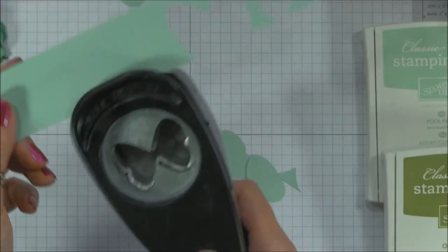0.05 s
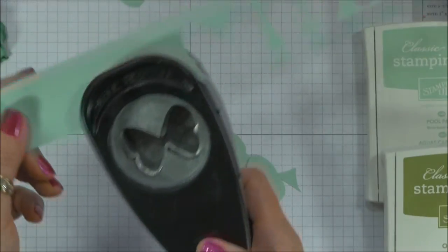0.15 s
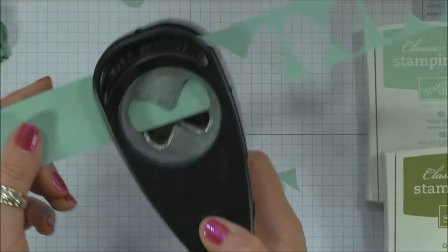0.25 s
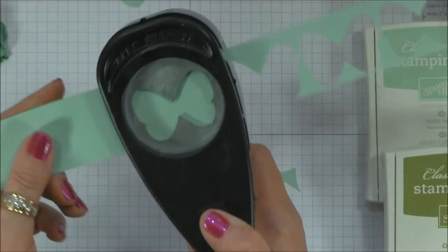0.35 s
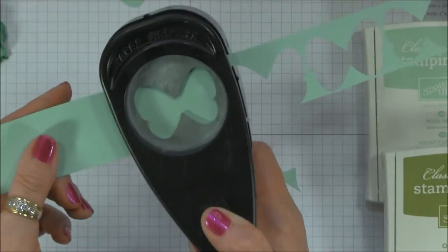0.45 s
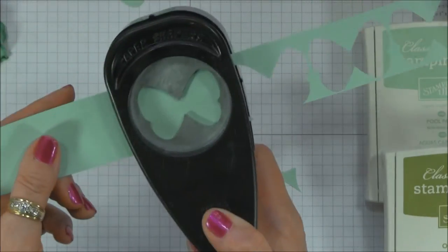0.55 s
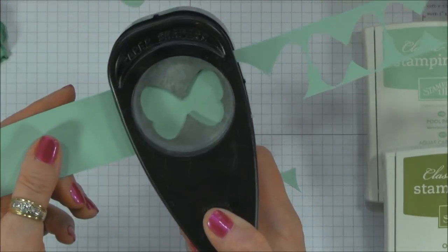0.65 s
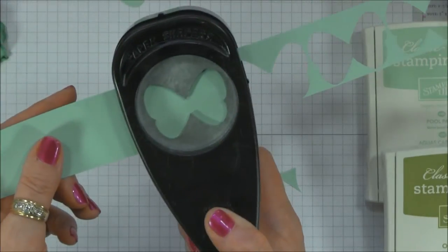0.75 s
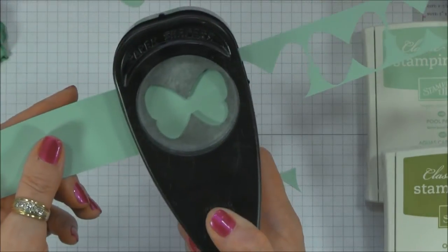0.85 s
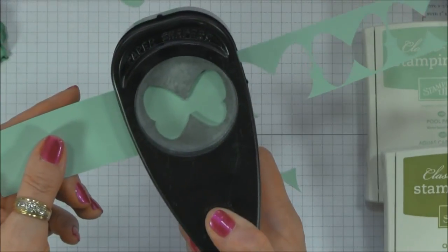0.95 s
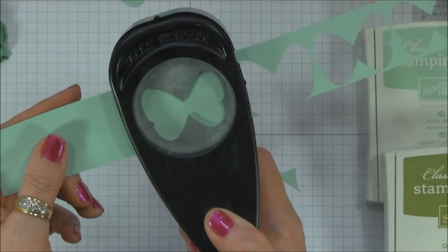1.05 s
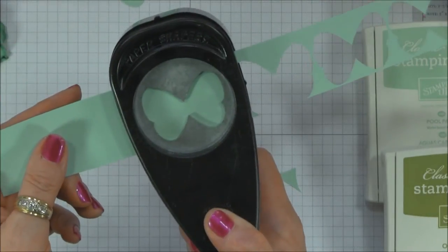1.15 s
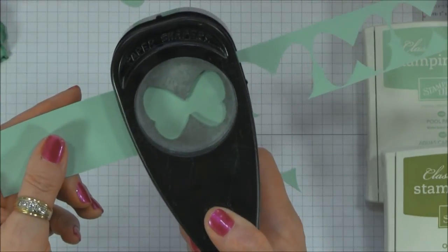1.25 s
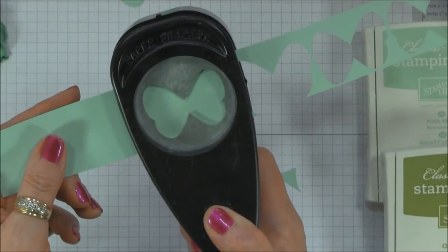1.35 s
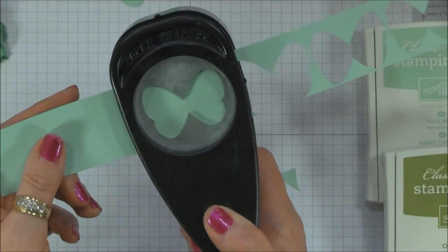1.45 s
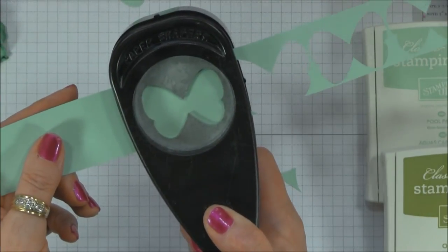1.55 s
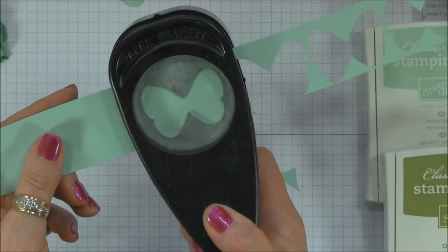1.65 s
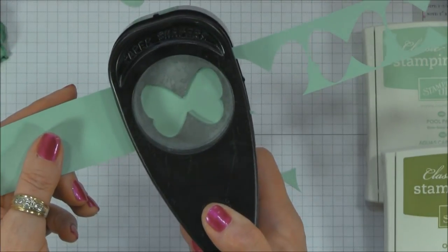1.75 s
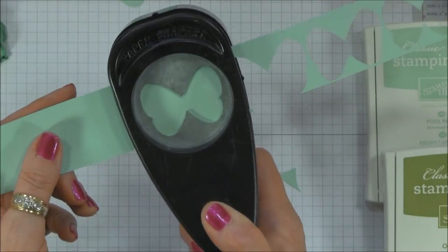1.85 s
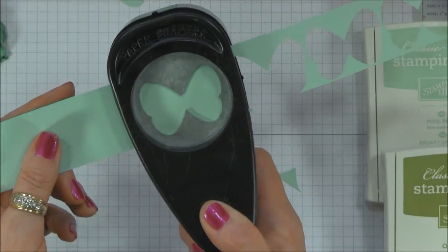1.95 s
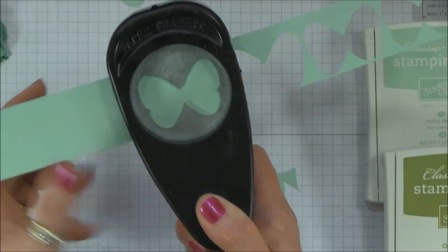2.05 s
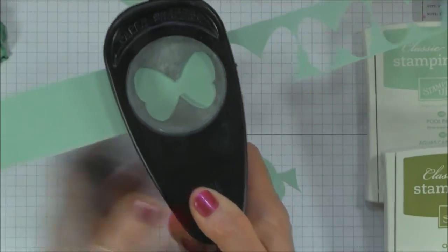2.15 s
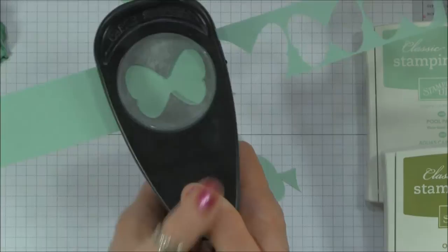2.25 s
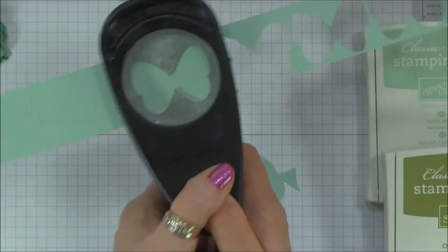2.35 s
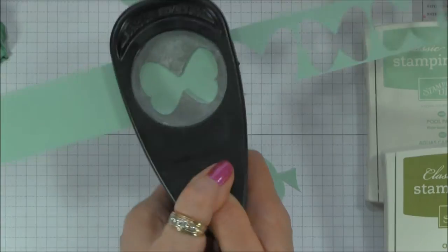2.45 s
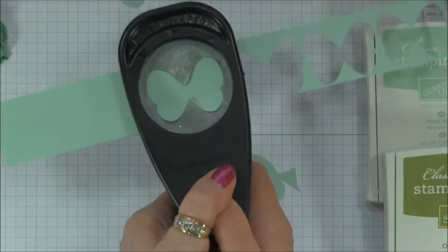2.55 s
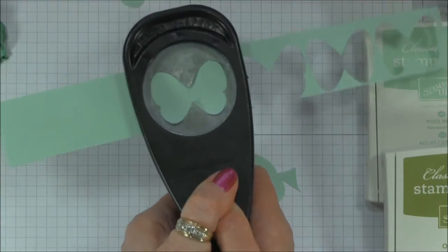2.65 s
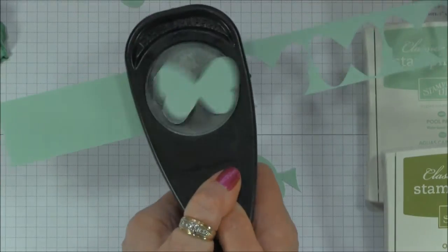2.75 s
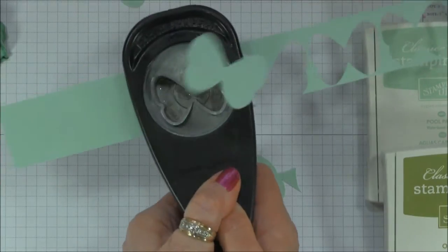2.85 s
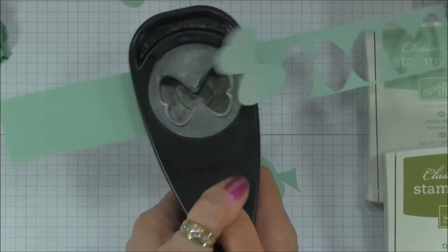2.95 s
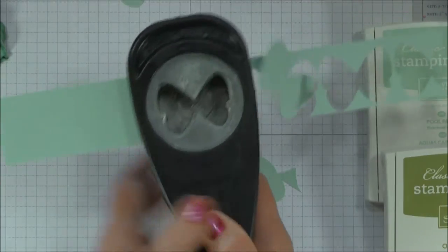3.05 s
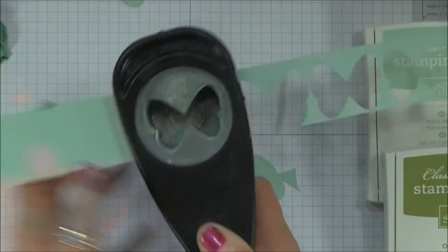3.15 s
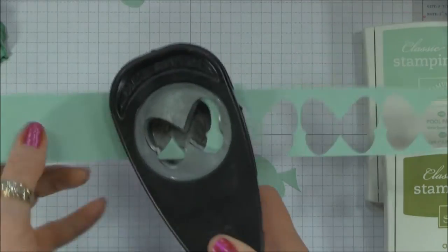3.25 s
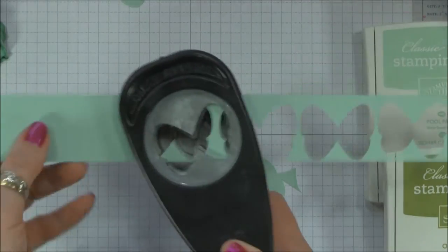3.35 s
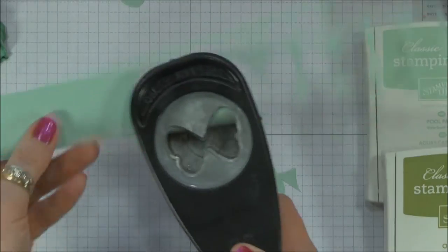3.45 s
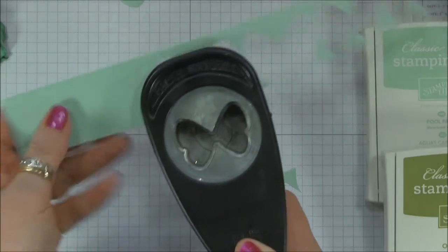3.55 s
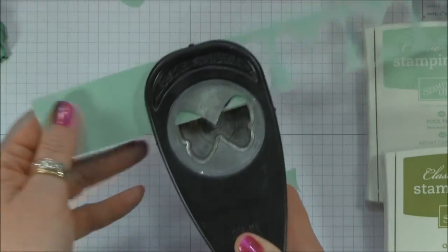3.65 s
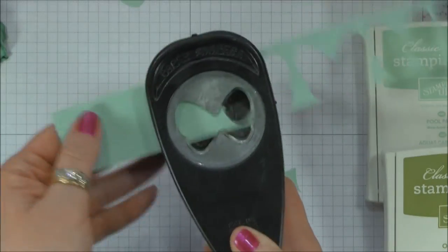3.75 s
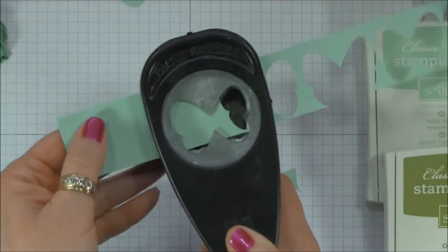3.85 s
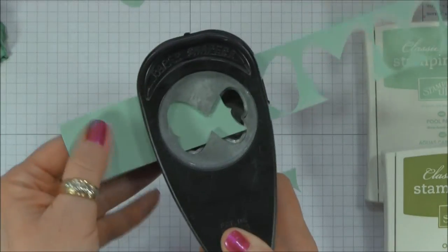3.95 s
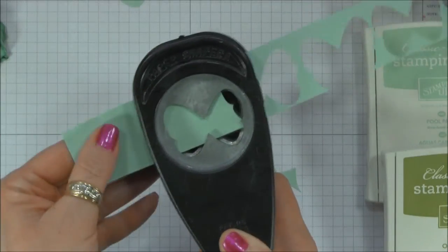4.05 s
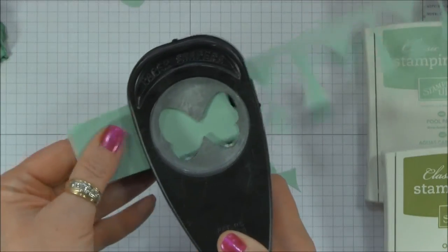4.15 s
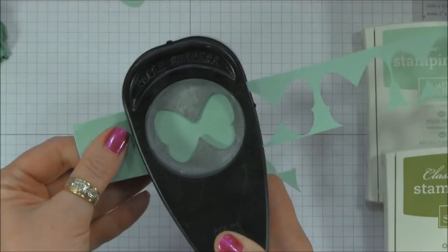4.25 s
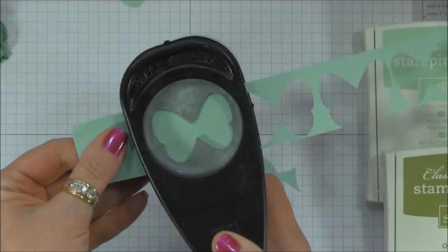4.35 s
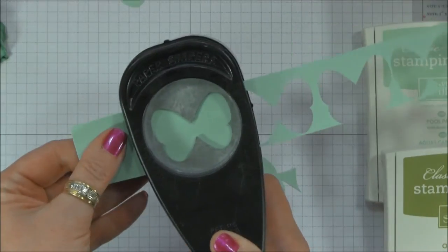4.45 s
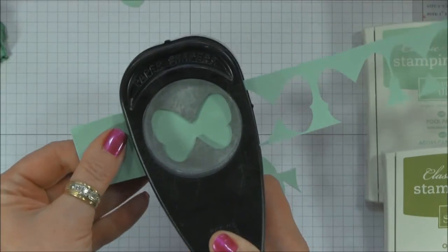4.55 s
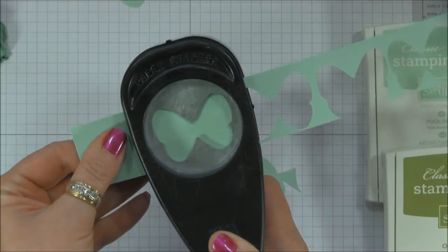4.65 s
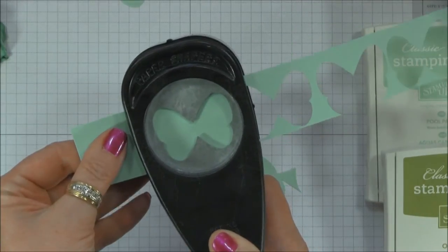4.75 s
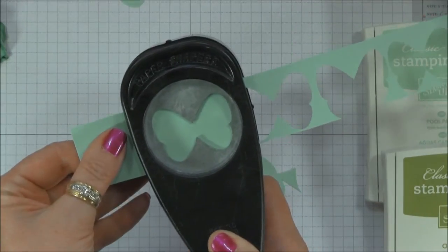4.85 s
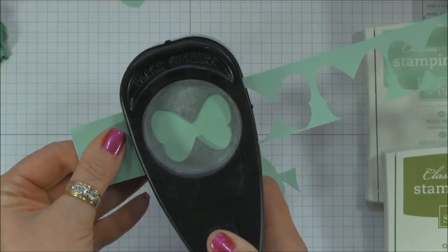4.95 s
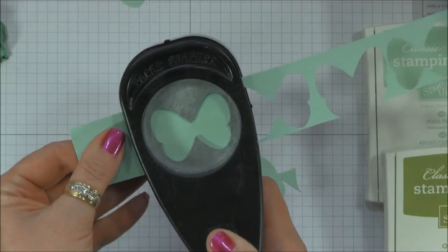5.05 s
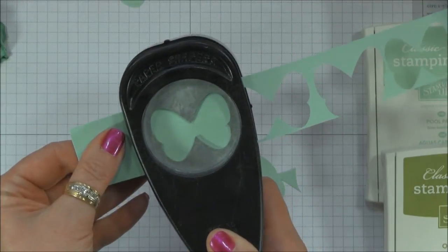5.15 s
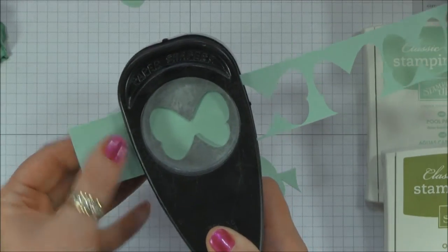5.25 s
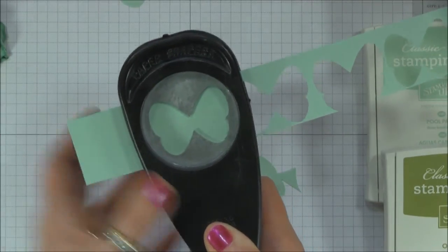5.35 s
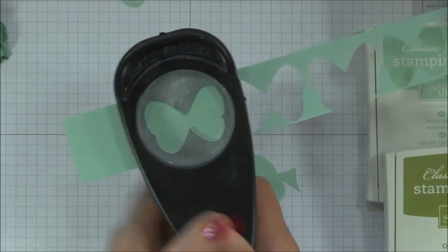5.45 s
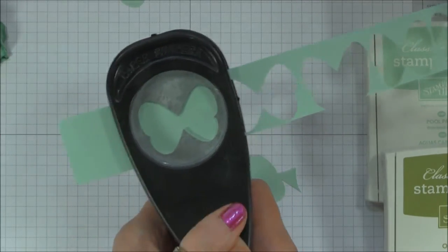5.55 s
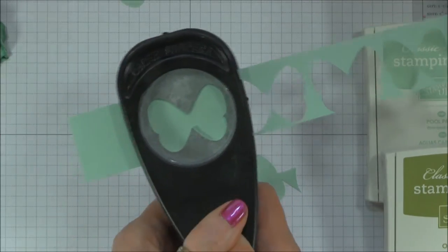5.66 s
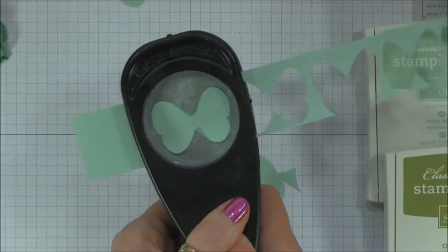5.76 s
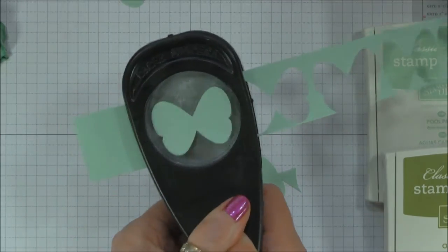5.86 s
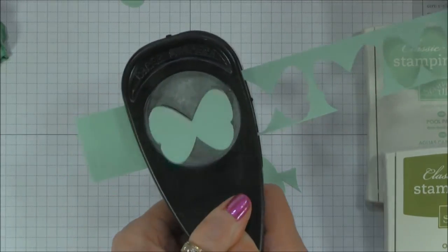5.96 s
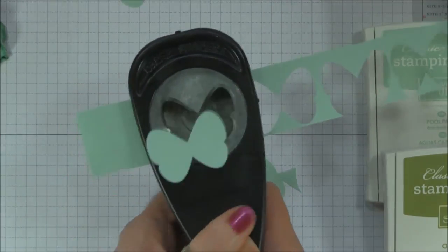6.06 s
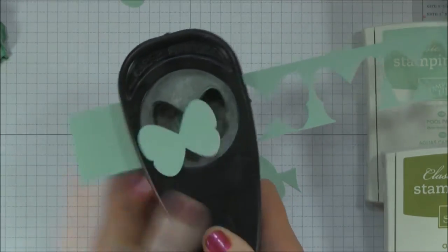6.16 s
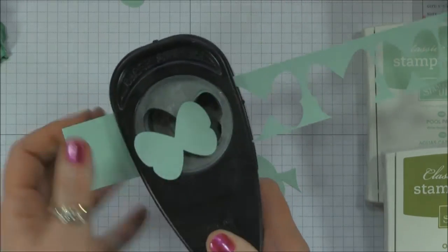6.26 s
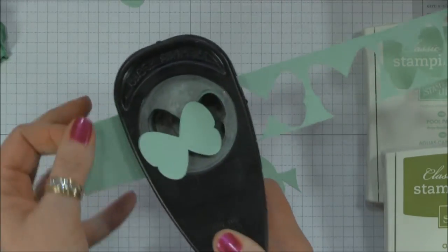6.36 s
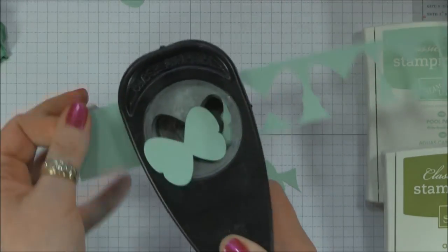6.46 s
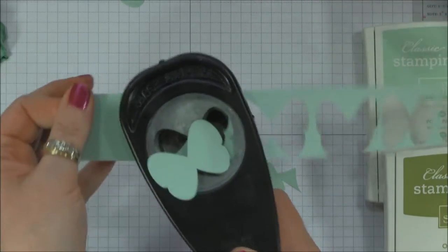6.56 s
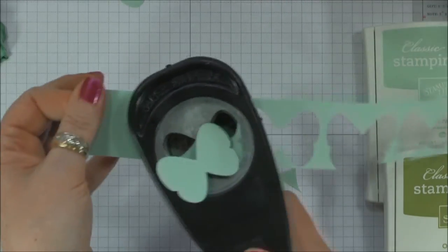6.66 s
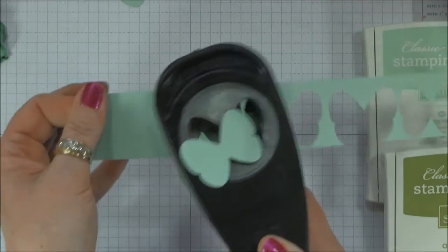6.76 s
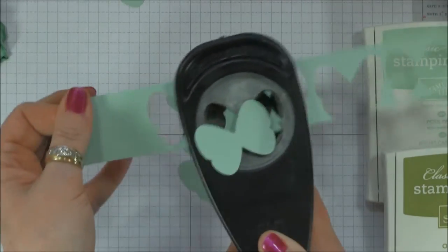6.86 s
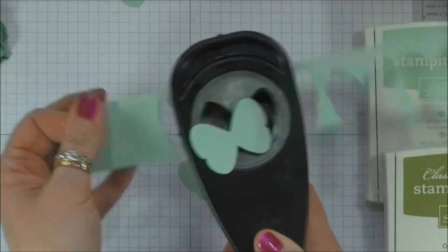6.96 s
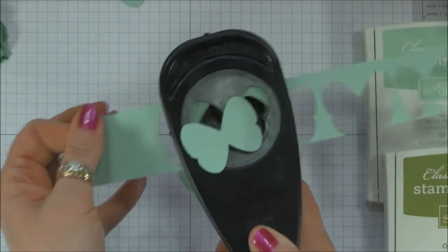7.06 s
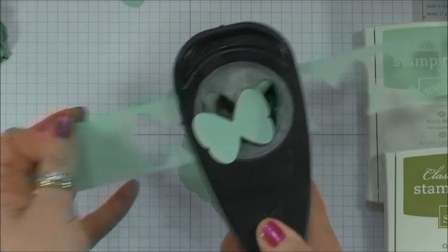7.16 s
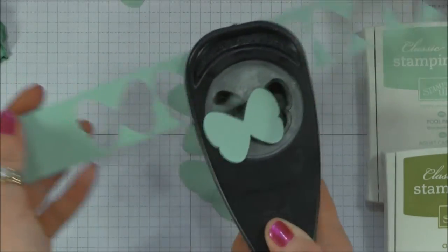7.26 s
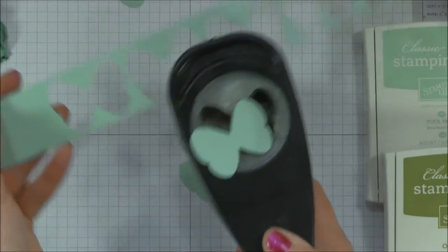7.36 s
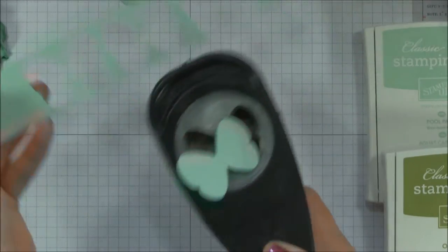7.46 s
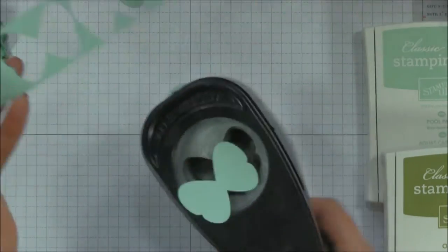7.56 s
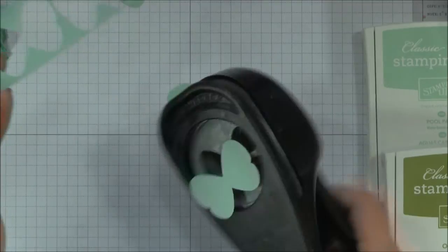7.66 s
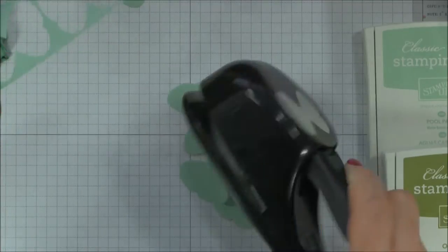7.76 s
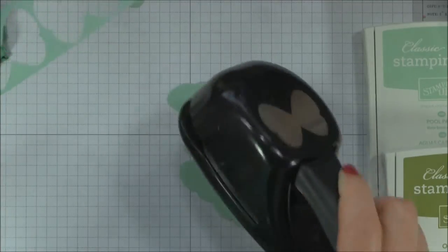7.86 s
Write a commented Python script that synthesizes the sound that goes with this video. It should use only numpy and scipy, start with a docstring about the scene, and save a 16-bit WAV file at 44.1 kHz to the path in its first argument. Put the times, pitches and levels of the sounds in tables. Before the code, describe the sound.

A paper punch is pressed twice through card at a craft table. Each press gives small metallic ticks and a crisp snap, then a louder clack as the sprung lever returns. Before, between and after the cuts, the card rubs quietly through the slot and hands tap the plastic body, with a few very soft table bumps. The small room adds a short echo, and ventilation rumbles faintly.

```python
"""A craft table in a small, live room: a hand-held lever punch cuts two shapes out of a strip of card.
Each time the steel die ticks under load and cracks through the card, then the sprung lever snaps
back with a louder clack. Around the cuts the strip rubs through the slot, and the hands knock the
plastic shell and bump the table. Ventilation rumbles faintly."""
import sys
import numpy as np
from scipy import signal
from scipy.fft import rfft, irfft
from scipy.io import wavfile

SR = 44100
rng = np.random.default_rng(int(sys.argv[2]) if len(sys.argv) > 2 else 0)


def to_wav(s):
    """Save 16-bit WAV."""
    ch = np.atleast_2d(s).T  # columns
    pcm = np.round(np.clip(ch, -1, 1) * 32767)  # PCM
    wavfile.write(sys.argv[1], SR, pcm.astype(np.int16))


N = 348390
RING_S = np.arange(SR // 2) / SR  # time and frequency axes of one impulse response
RING_HZ = np.maximum(np.fft.rfftfreq(len(RING_S), 1 / SR), 1)


def from_db(db):
    """Decibels to gain."""
    return 10 ** (np.asarray(db) / 20)


def unit_energy(x):
    """Scale each channel to a summed square of one."""
    return x / np.sqrt(np.sum(x ** 2, axis=-1, keepdims=True) + 1e-20)


def at_hz(points, hz):
    """Interpolate a table over log frequency."""
    points_hz, values = np.array(points).T
    return np.interp(np.log(hz), np.log(points_hz), values)


def add(track, start_s, sound):
    """Mix a sound in at start_s."""
    start = round(start_s * SR)
    track[..., start:start + sound.shape[-1]] += sound[..., :N - start]


def body(colour, resonances=(), tilt_db_per_oct=0):
    """Impulse response of a body: broad colour, tilt and resonances."""
    level_db = at_hz(colour, RING_HZ) + tilt_db_per_oct * np.log2(np.maximum(RING_HZ, colour[0][0]))
    for hz, width_hz, boost_db in resonances:
        detuning = 2 * (RING_HZ - hz) / width_hz
        level_db += 10 * np.log10(1 + (from_db(boost_db) ** 2 - 1) / (1 + detuning ** 2))
    cepstrum = irfft(np.log(from_db(level_db)))
    causal = 2 * cepstrum[:len(cepstrum) // 2]  # minimum phase: nothing sounds before contact
    return unit_energy(irfft(np.exp(rfft(causal, len(RING_S)))))


def stereo(mid, side, correlation):
    """Mix two unrelated signals to left and right with a given correlation."""
    correlation = np.clip(correlation, -.98, .98)
    common = np.sqrt(1 + correlation) * mid
    opposed = np.sqrt(1 - correlation) * side
    return np.array([common + opposed, common - opposed])


def room(x, build_s=0.0041, early_db=5.0, early_s=0.015, spread_db=3.0):
    """Reflections swell quickly off table and walls, then a diffuse tail dies band by band."""
    # reverberation: (frequency [Hz], t60 [s])
    decay = [(200, 0.07), (700, 0.31), (1500, 0.3122), (3500, 0.308), (7000, 0.3872), (15000, 0.2546)]
    # (frequency [Hz], left-right correlation [-1..1])
    correlation = [(150, 0.95), (300, 1), (600, 0.036), (1300, 0.18), (5000, -0.15), (14000, 0.39)]
    # (frequency [Hz], left minus right [dB])
    balance = [(150, -1), (300, -6), (600, -8), (1100, 1.5), (2000, -0.5), (4000, -0.8), (8000, 2.5),
               (15000, 1.5)]
    t, edges_hz = RING_S, np.geomspace(70, 17500, 34)
    swell = (1 - np.exp(-(t / build_s) ** 2)) * (1 + from_db(early_db) * np.exp(-t / early_s))
    echoes = rfft(rng.standard_normal((2, len(t))) * from_db(spread_db * rng.standard_normal(len(t))))
    response = 0
    for low_hz, high_hz in zip(edges_hz, edges_hz[1:]):
        hz = np.sqrt(low_hz * high_hz)
        in_band = irfft(echoes * ((RING_HZ >= low_hz) & (RING_HZ < high_hz)), len(t))
        mid, side = unit_energy(in_band * swell * from_db(-60 * t / at_hz(decay, hz)))
        side = unit_energy(side - mid * np.dot(mid, side))  # orthogonal to mid
        band = stereo(mid, side, at_hz(correlation, hz)) * np.sqrt((high_hz - low_hz) / SR)
        response += band * from_db(at_hz(balance, hz) * np.array([[.5], [-.5]]))
    return signal.oaconvolve(x[None], response, axes=1)[:, :N]


def grains(per_s, spread_db, size):
    """Tiny clicks of random time, sign and size."""
    present = rng.random(size) < per_s / SR
    sign = rng.choice([-1, 1], size)
    return present * sign * from_db(spread_db * np.clip(rng.standard_normal(size), -2, 2))


def blows(hits, colour, resonances, grains_per_s, spot_db, spot_rel_width):
    """Sharp contacts, each trailed by dying crackle, sound through shell, struck spot and room."""
    out = np.zeros(N)
    for start_s, level_db, tilt_db_per_oct, crackle_db, crackle_s, spot_hz in hits:
        crackle = grains(grains_per_s, spread_db=5, size=len(RING_S)) * np.exp(-RING_S / crackle_s)
        force = from_db(crackle_db) * unit_energy(crackle)
        force[0] += 1  # first contact
        spot = (spot_hz, spot_rel_width * spot_hz, spot_db)
        shell = body(colour, [*resonances, spot], tilt_db_per_oct)
        add(out, start_s, from_db(level_db) * unit_energy(signal.fftconvolve(force, shell)))
    return room(out)


def ventilation(rms_db=-65, duct_hz=296, duct_width_hz=12, duct_db=6):
    """Steady rumble with a faint duct tone and thin hiss."""
    # air noise: (frequency [Hz], relative density [dB])
    colour = [(12, -43.5), (20, -20.5), (64, -3.5), (90, -9), (112, -9), (259, -16), (289, -12.5),
              (416, -20), (452, -16), (581, -20), (1870, -26), (2680, -28), (3350, -30), (4430, -30.5),
              (15500, -39.5)]
    # (frequency [Hz], left-right correlation [-1..1])
    correlation = [(60, 0.88), (130, .1), (290, -0.49), (640, -0.75), (1410, -0.48), (3100, -0.43),
                   (7000, -0.31), (15000, 0.24)]
    hz = np.maximum(np.fft.rfftfreq(N, 1 / SR), 1)
    mid, side = rfft(rng.standard_normal((2, N)))
    peak_db = duct_db / (1 + (2 * (hz - duct_hz) / duct_width_hz) ** 2)
    spectrum = from_db(at_hz(colour, hz) + peak_db) * stereo(mid, side, at_hz(correlation, hz))
    return from_db(rms_db) * np.sqrt(N) * unit_energy(irfft(spectrum, N))


def shell_knocks(crackle_db=-3.5, soft_drag_s=0.029, hard_drag_s=0.0099, hard_db_per_oct=4):
    """Fingers and card knock the shell: a dull fingertip drags on, a bright, hard edge lets go."""
    # (time [s], level [dB], tilt [dB/oct], struck spot [Hz])
    knocks = [(.098, -35.5, 2.2, 1900), (.276, -30, 7, 1280), (.303, -36.5, 4.5, 2100),
              (2.075, -26, -0.1, 720), (2.104, -17.5, -0.5, 1120), (2.444, -27.5, 3, 3830),
              (3.253, -33.5, 3.5, 2690), (3.309, -22, -0.3, 2250), (3.368, -28, 0.9, 4540),
              (3.998, -30, 0.5, 1200), (4.101, -29, 1.5, 3300), (5.355, -32.5, 0.7, 1000),
              (5.496, -36.5, -4, 550), (6.401, -33.5, 3.5, 3000), (6.626, -28.5, 3, 4500),
              (7.748, -28.5, 2.5, 5300), (7.854, -26.5, 4.5, 2900)]
    # knock spectrum: (frequency [Hz], relative density [dB])
    colour = [(100, -15.5), (250, -0.5), (550, 0), (1200, 1), (2000, -2.5), (3300, -4), (6000, -8.5),
              (15000, -26.5)]
    # gripped handle resonances: (frequency [Hz], width [Hz], boost [dB])
    handle = [(670, 110, 5.5), (1210, 79, 4.5), (1590, 130, 4), (2590, 90, 5), (3525, 130, 7)]
    hits = []
    for start_s, level_db, tilt_db_per_oct, spot_hz in knocks:
        drag_s = np.interp(tilt_db_per_oct, [0, hard_db_per_oct], [soft_drag_s, hard_drag_s])
        hits.append((start_s, level_db, tilt_db_per_oct, crackle_db, drag_s, spot_hz))
    return blows(hits, colour, handle, grains_per_s=800, spot_db=6.5, spot_rel_width=.2)


def sliding_card(split_hz=7000, rub_db=3.5, hiss_db=2.5, drop_db=9.5, snag_db=1.5, snags_per_s=70):
    """Fibres catch and slip on the slot's edges; each tug swells and fades with its speed."""
    # (fastest moment [s], swell [s], fade [s], relative level [dB], hiss trim [dB], free strip [Hz])
    tugs = [(.225, 0.031, 0.12, -66, -4, 2070), (0.304, 0.074, 0.16, -64.5, -5, 2110),
            (3.07, 0.069, 0.078, -62, -6.5, 2860), (3.515, 0.048, 0.068, -61.5, -2, 3700),
            (3.68, 0.071, 0.068, -67.5, -2, 3670), (3.86, 0.051, 0.069, -61, -4.5, 3620),
            (4.22, 0.11, 0.13, -76, -5, 3300), (6.17, 0.046, 0.073, -62, -5, 4150),
            (6.31, 0.053, 0.064, -70.5, -10.5, 3050), (6.545, 0.034, 0.08, -72, -2, 2900),
            (6.645, 0.034, 0.1, -71.5, -7, 3020), (6.9, 0.083, 0.081, -69, -2, 2950),
            (7.055, 0.066, 0.052, -71, -2, 2950), (7.205, 0.069, 0.15, -67, -0.5, 3030),
            (7.365, 0.027, 0.042, -71, -0.5, 3100), (7.47, 0.071, 0.076, -75.5, 2, 2950)]
    # friction spectrum: (frequency [Hz], relative density [dB])
    colour = [(200, -3.5), (600, -2), (950, -6), (1300, 2.5), (2000, -2.5), (3200, 1.5), (6000, -4),
              (9000, -11), (15000, -14)]
    # resonances of the card in its slot: (frequency [Hz], width [Hz], boost [dB])
    slot = [(1260, 84, 6), (2097, 160, 5.4), (2848, 230, 1.5)]
    crossover = [signal.butter(4, split_hz, kind, fs=SR, output="sos") for kind in ("low", "high")]
    out, t = np.zeros((2, N)), np.arange(SR) / SR
    for peak_s, swell_s, fade_s, level_db, trim_db, strip_hz in tugs:
        start_s = max(peak_s - .5, 0)
        card = body(colour, [*slot, (strip_hz, .12 * strip_hz, 4.5)])
        slips = grains(per_s=5000, spread_db=3, size=(2, SR))
        friction = signal.oaconvolve(slips, card[None], axes=1)[:, :SR]
        rub, hiss = (np.sqrt(SR) * unit_energy(signal.sosfilt(sos, friction)) for sos in crossover)
        off_peak = np.maximum((peak_s - start_s - t) / swell_s, (start_s + t - peak_s) / fade_s)
        snags = np.interp(t * snags_per_s, np.arange(SR), rng.standard_normal(SR))
        envelope = from_db(level_db - drop_db * off_peak ** 2 + snag_db * snags)
        add(out, start_s, envelope * (from_db(rub_db) * rub + from_db(trim_db + hiss_db) * hiss))
    return out


def die_ticks(attack_s=.003, click_db=22.5, direct_db=-1.0, reflected_db=-2.5):
    """Contact clicks and rings the steel die; where it is touched sets which close modes lead and beat."""
    # (time [s], relative level [dB], leading pitch [Hz], other modes [dB])
    ticks = [(1.061, -66, 1608, -4), (1.723, -48, 4290, -5), (2.4, -55, 1608, -11), (2.489, -45, 5043, 0.5),
             (2.844, -35, 1608, -13.5), (5.107, -45.5, 4990, -5), (5.331, -65, 1608, -1.5),
             (5.642, -51.5, 1608, -8), (5.694, -48.5, 6830, -1.5), (5.94, -39, 1608, -14.5),
             (6.186, -53.5, 1250, -23), (6.274, -57, 3155, -18), (7.748, -56, 1930, -19)]
    # modes of die and spring: (frequency [Hz], relative level [dB], t60 [s])
    steel = [(1235, -12.5, 0.21), (1514, -15, 0.12), (1586, -9.5, 0.6), (1890, -12.5, 0.14),
             (2310, -5.5, 0.18), (2590, -2, .18), (3200, -12.5, 0.17), (3740, -7, 0.23), (4280, -2.5, 0.3),
             (4350, -8.5, .18), (4680, -6, .2), (5040, -5, 0.35), (5100, -11.5, .18), (5530, -12.5, .16),
             (5940, -14, .2), (6150, -8, .2), (6830, -8.5, .18), (7535, -4, 0.21), (8690, -8.5, .12)]
    # click spectrum: (frequency [Hz], relative density [dB])
    colour = [(400, -33.5), (1000, -20.5), (1400, -5.5), (2000, -10), (2500, 1), (4500, 3), (7500, -5),
              (9500, -17.5), (15000, -22.5)]
    hz, mode_db, t60_s = np.array(steel).T[:, :, None]
    rings, clicks, t = np.zeros((2, N)), np.zeros(N), RING_S
    modes = from_db(-60 * t / t60_s) * np.exp(2j * np.pi * hz * t) * (1 - np.exp(-t / attack_s))
    click = body(colour)
    for start_s, level_db, lead_hz, others_db in ticks:
        leads = abs(np.log(hz / lead_hz)) < .07  # within about 7 %
        lift_db = -np.max(mode_db[leads], initial=-20)
        weight = from_db(mode_db + np.where(leads, lift_db, others_db))
        phase = np.exp(2j * np.pi * rng.random(hz.shape))
        ring = np.sum(weight / np.linalg.norm(weight) * phase * modes, axis=0)
        add(rings, start_s, from_db(level_db) * np.array([ring.real, ring.imag]))  # sides 90 deg apart
        add(clicks, start_s, from_db(level_db + click_db) * click)
    return from_db(direct_db) * rings + room(clicks + from_db(reflected_db) * rings[0])


def table_thuds(mode_hz=98, t60_s=0.12, attack_s=0.0051):
    """A soft bump of the hand rocks the table top in its lowest mode."""
    # (time [s], relative level [dB])
    bumps = [(2.260, -55.5), (2.2793, -60), (5.501, -55), (7.864, -57.5)]
    out, t = np.zeros(N), RING_S
    envelope = from_db(-60 * t / t60_s) * (1 - np.exp(-t / attack_s))
    thud = 2 * envelope * np.sin(2 * np.pi * mode_hz * t)
    for start_s, level_db in bumps:
        add(out, start_s, from_db(level_db) * thud)
    return out


def card_cuts():
    """The die cracks through the card in stages, sounding the closed shell."""
    # (time [s], level [dB], tilt [dB/oct], crackle [dB], crackle decay [s], struck spot [Hz])
    cracks = [(2.470, -18.5, 1.5, -7, .006, 448), (2.489, -18.5, 2, -4, .01, 1210),
              (2.592, 6.5, 1, -11, 0.016, 850), (2.668, -19.5, 4, -2.5, 0.009, 3550),
              (5.637, -19, 0.9, 6, .035, 3200), (5.693, -24.5, 2.5, -1, .015, 1200),
              (5.743, 3.5, 0.2, -15, 0.025, 2600), (5.796, -7, 2, -6.5, .01, 1600)]
    # crack spectrum: (frequency [Hz], relative density [dB])
    colour = [(100, -36.5), (180, -23.5), (260, -8), (350, -9.5), (520, -2), (1000, -2.5), (2000, -5.5),
              (3300, -3), (5000, -6), (8000, -14.5), (12000, -19), (16000, -24.5)]
    # resonances: (frequency [Hz], width [Hz], boost [dB])
    closed_shell = [(275, 50, 2), (590, 62, -2), (790, 77, 3.5), (1180, 57, 8.5), (1620, 110, 6),
                    (2430, 83, 9), (3430, 110, 5)]
    return blows(cracks, colour, closed_shell, grains_per_s=800, spot_db=2.5, spot_rel_width=.3)


def lever_clacks():
    """The lever springs back and hits its stop in quick steps, sounding the open shell."""
    # (time [s], level [dB], tilt [dB/oct], crackle [dB], crackle decay [s], struck spot [Hz])
    clacks = [(2.841, 5.9, 3, -12.5, .003, 4463), (2.845, 11.8, 0.5, -9.5, .01, 2682),
              (2.848, 8.7, -0.5, -14.5, .008, 1682), (5.9375, 5.5, 5.5, -7.5, .003, 3000),
              (5.9405, 13.8, 0.64, -15, .008, 3620)]
    # clack spectrum: (frequency [Hz], relative density [dB])
    colour = [(100, -38.5), (260, -24), (450, -17), (800, -14.5), (1100, -3), (2000, -7), (2900, -3.5),
              (4500, -7), (7000, -12), (10000, -19), (16000, -23.5)]
    # resonances: (frequency [Hz], width [Hz], boost [dB])
    open_shell = [(1139, 57, 11), (1496, 60, 8.3), (1585, 50, 12), (1754, 79, 5), (1906, 54, 7.5),
                  (2200, 70, 3), (2640, 91, 5), (2820, 55, 3), (3900, 140, 1.6)]
    return blows(clacks, colour, open_shell, grains_per_s=1000, spot_db=4.0, spot_rel_width=.3)


def scene():
    """Punch, hands and card over the ventilation."""
    punch = card_cuts() + lever_clacks() + shell_knocks() + die_ticks()
    return punch + table_thuds() + sliding_card() + ventilation()


def record(dry):
    """Steep low-pass at 15.8 kHz."""
    return signal.sosfilt(signal.ellip(10, .1, 70, 15800, fs=SR, output="sos"), dry)


dry = scene()
out = record(dry)
to_wav(out)
```